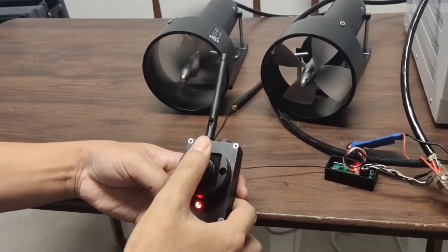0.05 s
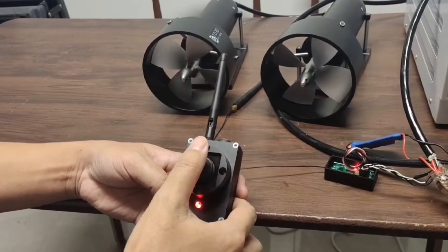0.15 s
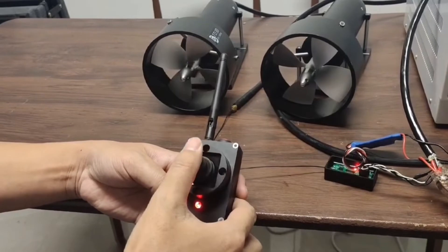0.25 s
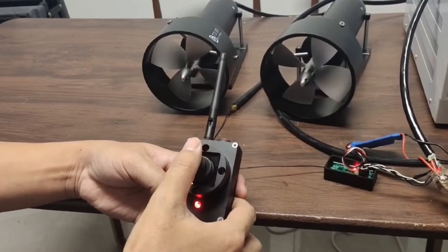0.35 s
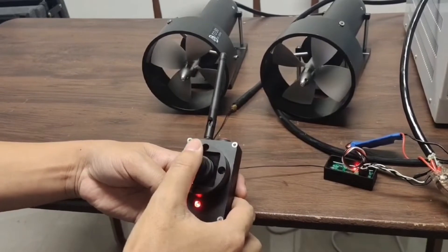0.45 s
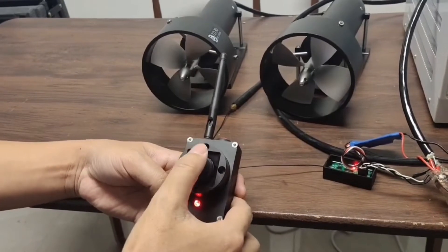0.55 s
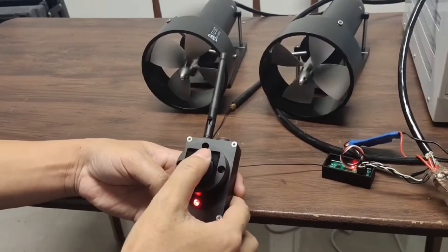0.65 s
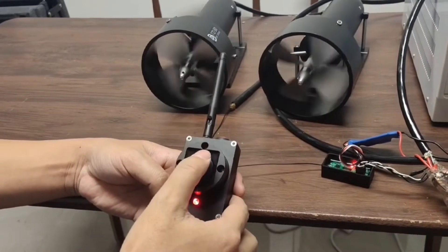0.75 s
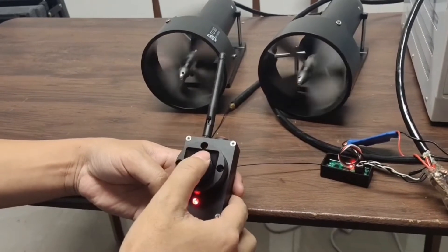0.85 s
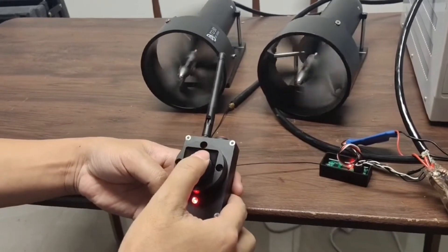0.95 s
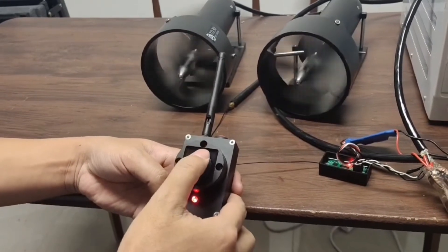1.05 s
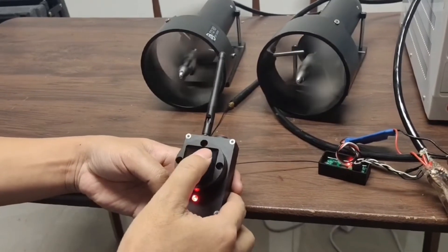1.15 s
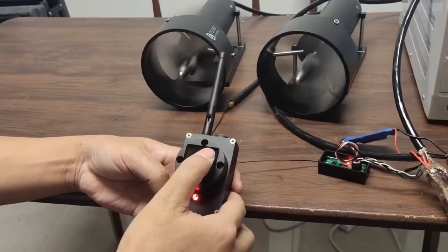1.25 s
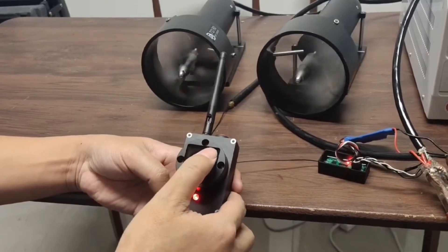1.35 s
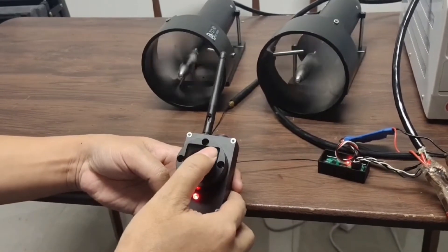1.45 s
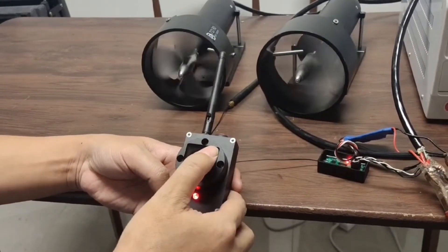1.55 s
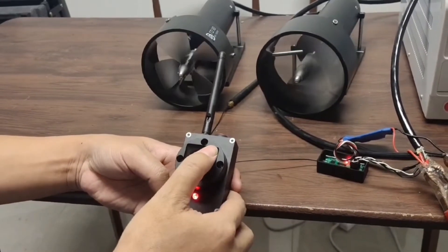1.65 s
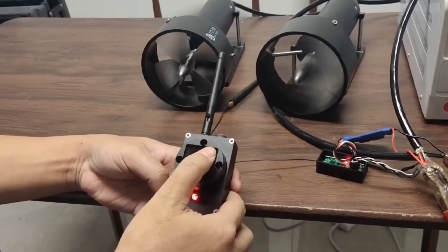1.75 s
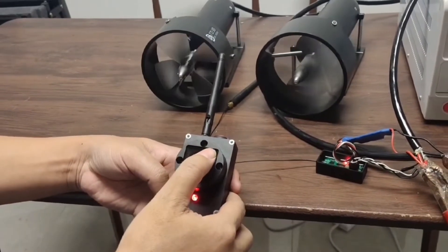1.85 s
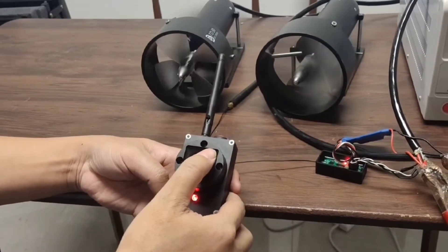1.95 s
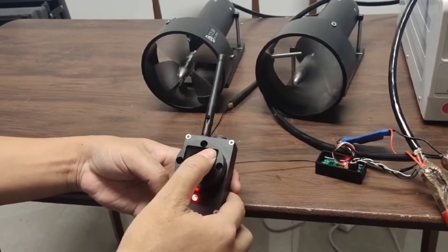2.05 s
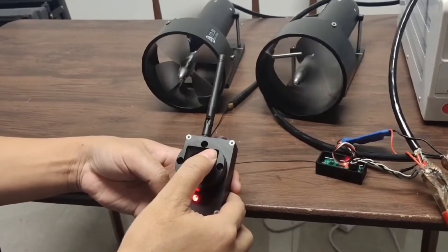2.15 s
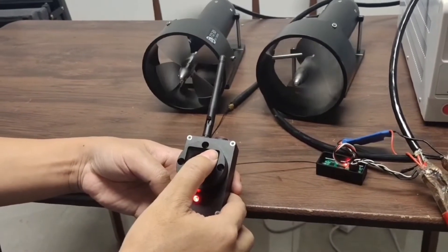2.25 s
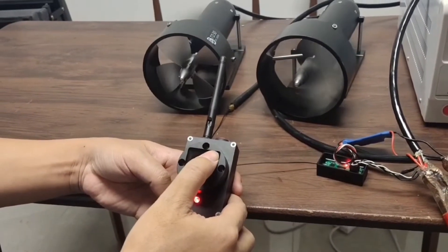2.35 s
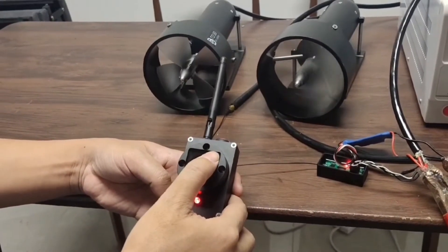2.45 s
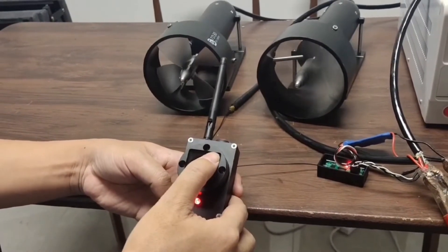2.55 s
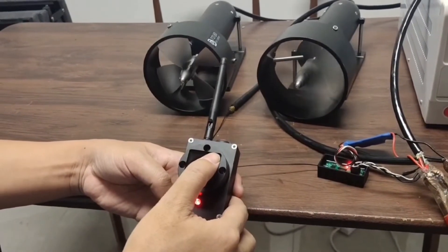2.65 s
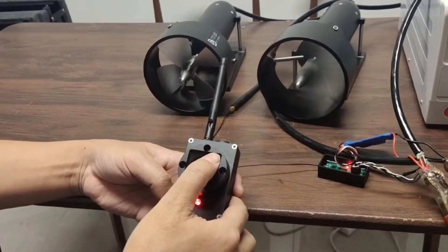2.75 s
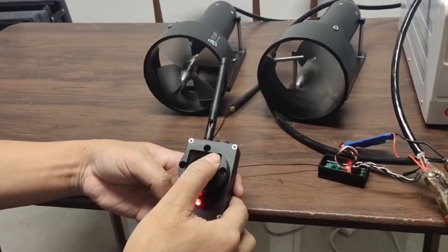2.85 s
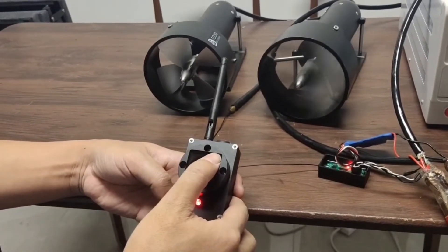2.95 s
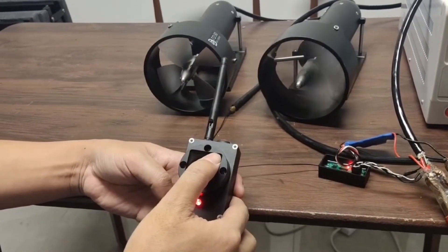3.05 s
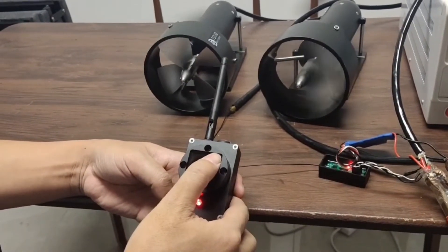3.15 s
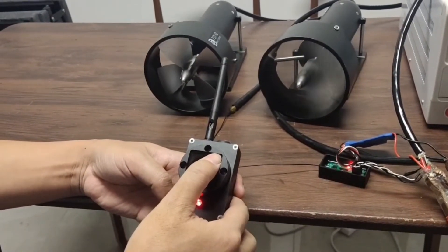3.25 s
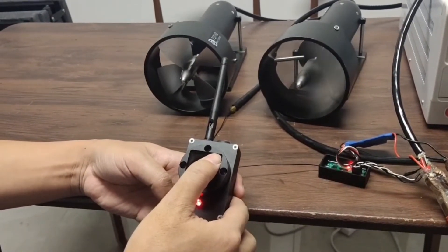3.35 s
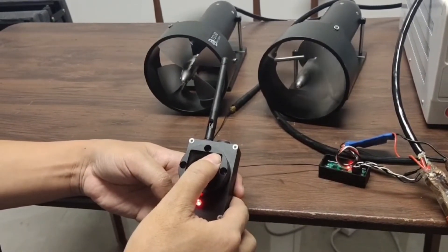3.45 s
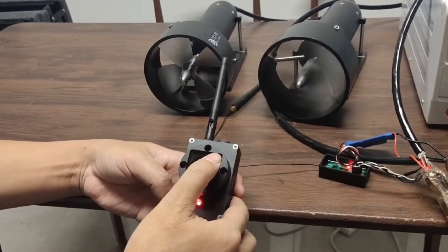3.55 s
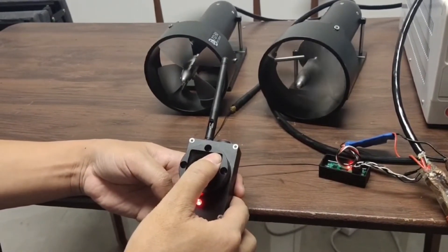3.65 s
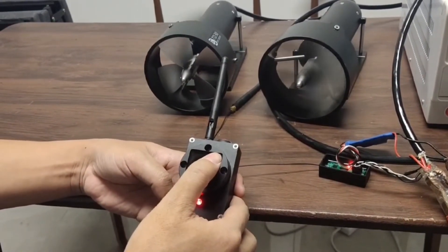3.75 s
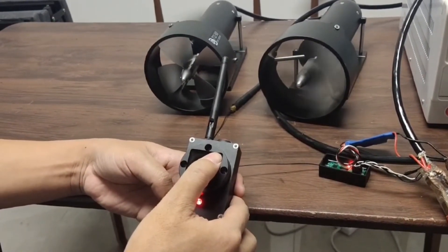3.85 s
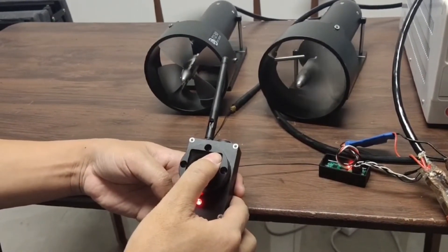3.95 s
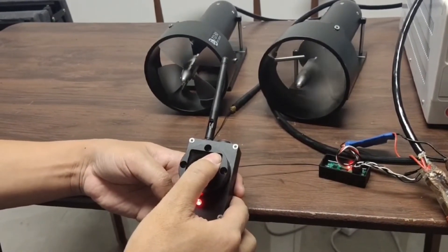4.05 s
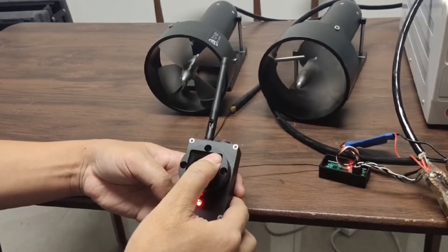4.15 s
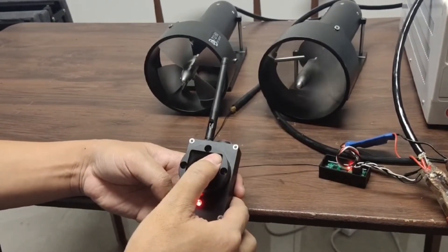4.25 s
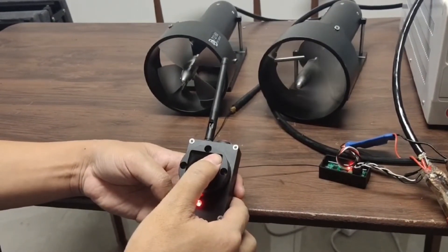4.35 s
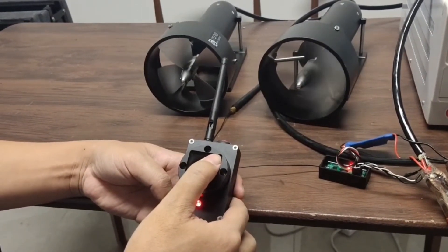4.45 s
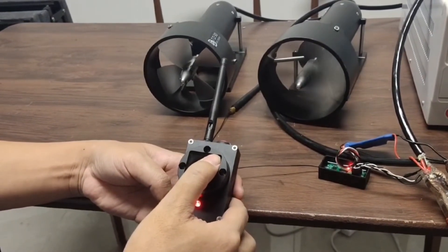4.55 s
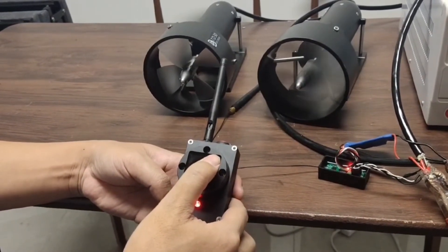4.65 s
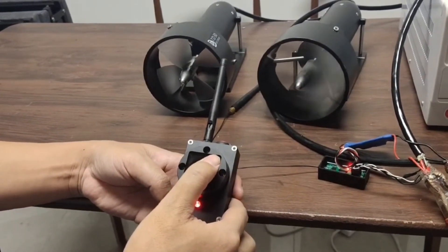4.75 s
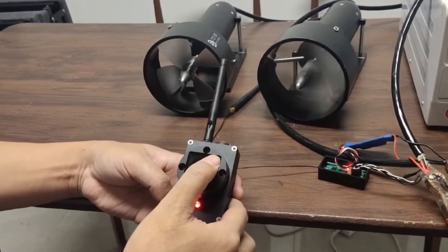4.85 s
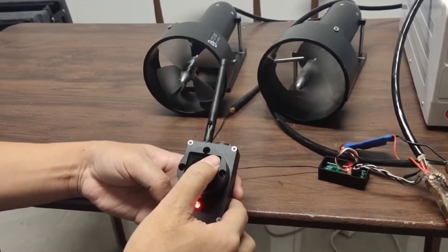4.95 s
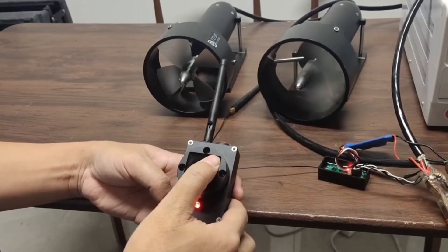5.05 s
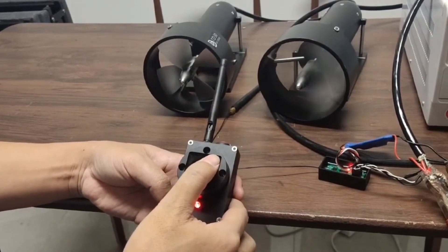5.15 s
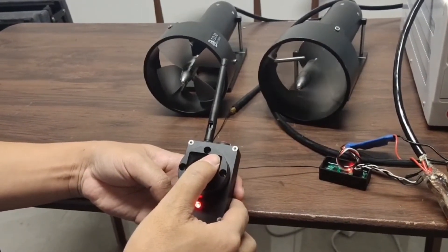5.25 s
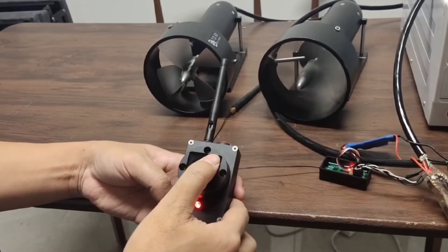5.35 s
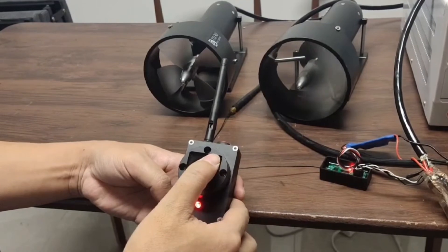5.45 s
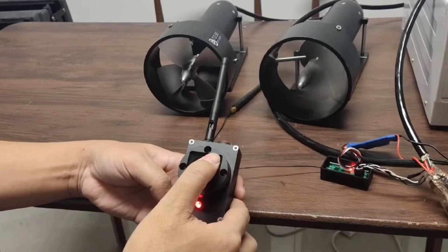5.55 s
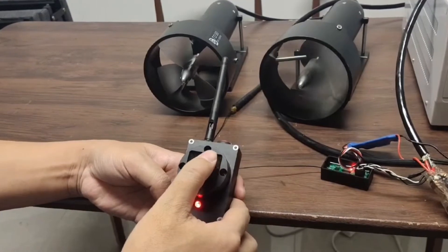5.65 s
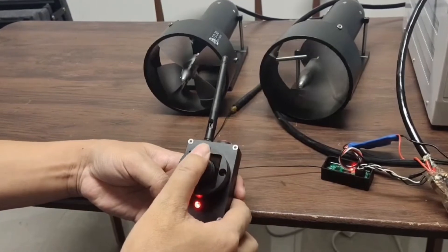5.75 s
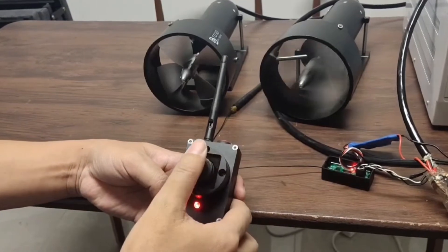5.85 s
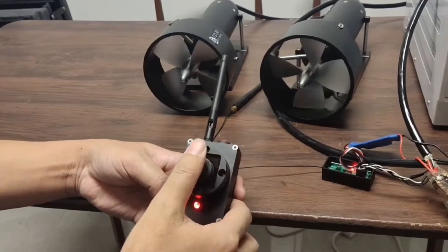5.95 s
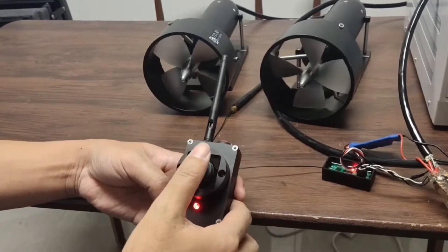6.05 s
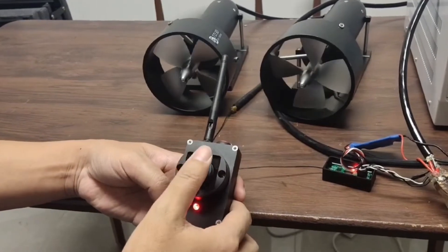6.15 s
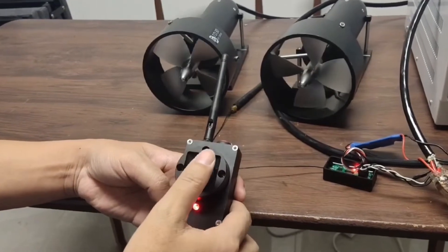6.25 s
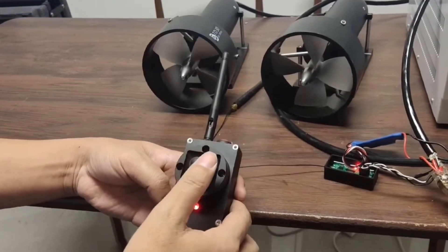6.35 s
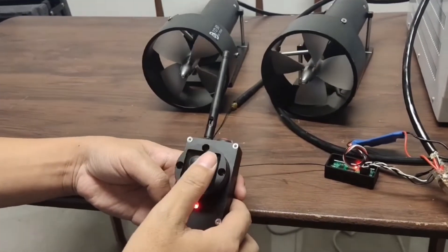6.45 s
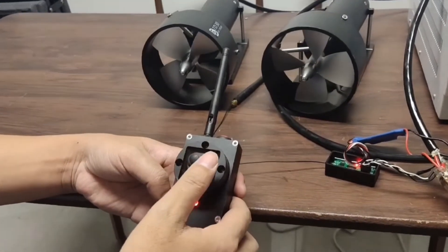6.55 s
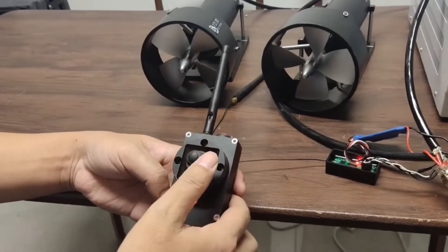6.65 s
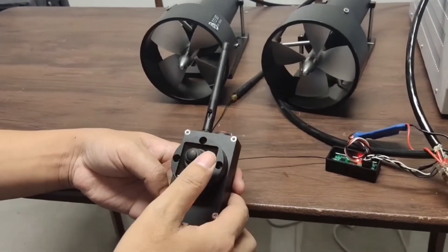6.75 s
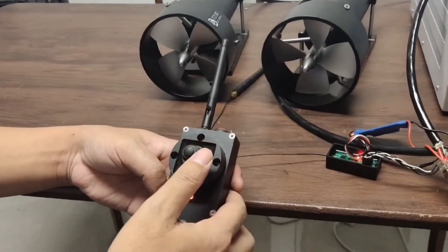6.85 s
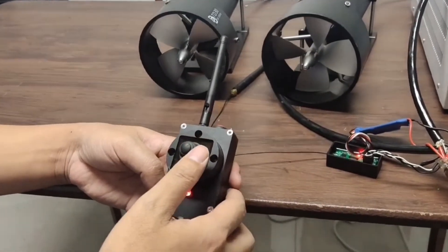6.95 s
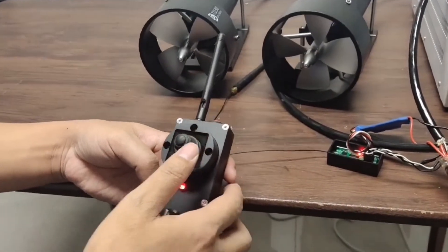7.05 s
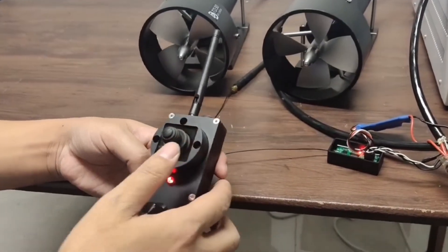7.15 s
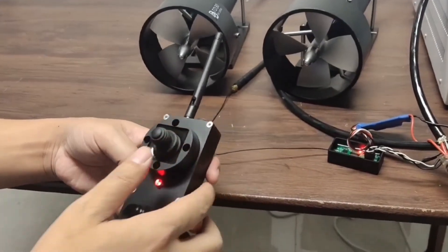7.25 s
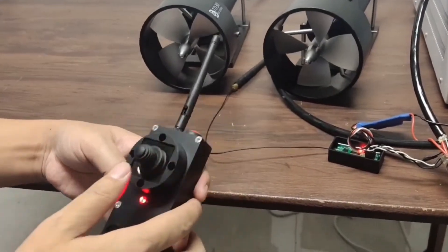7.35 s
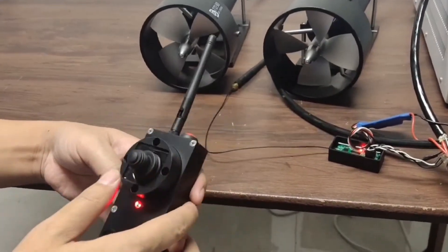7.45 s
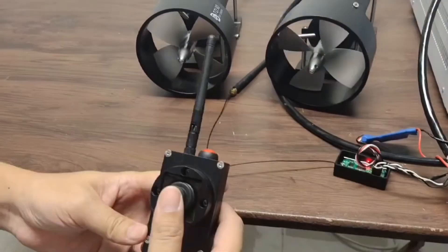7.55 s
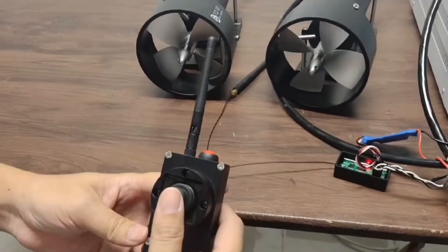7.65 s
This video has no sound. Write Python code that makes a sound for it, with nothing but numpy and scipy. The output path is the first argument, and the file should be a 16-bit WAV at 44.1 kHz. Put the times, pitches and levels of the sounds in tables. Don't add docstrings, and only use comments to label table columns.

```python
import sys
import numpy as np
from scipy import signal
from scipy.fft import rfft, irfft, next_fast_len
from scipy.io import wavfile
from scipy.ndimage import uniform_filter1d, map_coordinates

SR = 44100
rng = np.random.default_rng(int(sys.argv[2]) if len(sys.argv) > 2 else 0)


def put_to_file(sound):
    columns = np.atleast_2d(sound).T
    safe = np.clip(columns, -1, 1)
    whole_steps = np.round(safe * 32767)
    wavfile.write(sys.argv[1], SR, whole_steps.astype(np.int16))


def magnitude_from_level(level_db):
    exponent = np.asarray(level_db, float) / 20
    return 10 ** exponent


N = 340009

TOP_HZ = 1936.5
FULL_HZ = TOP_HZ / 60
EASY_PER_S = .2

# shaft order, level at full speed in dB rms.
POLE_ORDERS = [(8, -68), (17, -64), (18, -55), (19, -57), (20, -40), (21, -59), (30, -66), (40, -54),
               (54, -62), (60, -46.5)]
# shaft order, level at full
# speed in dB rms.
FURTHER_ORDERS = [(64, -64), (68, -62), (75, -53), (103, -62), (140, -65), (151, -58), (154, -64), (156, -61),
                  (158, -67), (165, -63), (166, -57), (167, -63), (168, -63), (170, -52), (172, -65),
                  (176, -67), (178, -65), (180, -63), (220, -73), (237, -77), (290, -71), (293, -69),
                  (294, -68), (296, -65), (297, -67), (315, -69), (316, -70),
                  (24, -67), (26, -68), (29, -72), (31, -69), (33, -74), (59, -66), (65, -66), (66, -70),
                (70, -70), (80, -70), (85, -72), (96, -73), (101, -67), (106, -67), (109, -67), (113, -72),
                (116, -72), (120, -71), (141, -72), (142, -71), (144, -74), (153, -71), (160, -68),
                (161, -70), (162, -69), (164, -67), (169, -69), (171, -68), (175, -71), (177, -70),
                (257, -75), (267, -74), (274, -75), (291, -71), (292, -72), (298, -71), (311, -72)]
ALL_ORDERS = POLE_ORDERS + FURTHER_ORDERS


def unit(x):
    return x / np.sqrt(np.mean(x ** 2) + 1e-20)


def along(points, hz):
    f, v = np.transpose(points)
    return np.interp(np.log(hz + 1), np.log(f + 1), v)


def wobble(rate):
    at = np.arange(0, N + 32, 32)
    knots = rng.standard_normal(int(N * rate / SR) + 4)
    return np.interp(np.arange(N), at, map_coordinates(knots, [at * rate / SR]))


def filtered(x, response):
    m = next_fast_len(N + SR)
    gain = response(np.fft.rfftfreq(m, 1 / SR))
    return irfft(rfft(x, m) * gain / np.sqrt(np.mean(np.abs(gain) ** 2)), m)[:N]


def resonance(f, center, width):
    return 1j * f * width / (center * center - f * f + 1j * f * width)


def quiet():
    # frequency in Hz, density in dB per Hz.
    air = [(15, -45), (25, -37.5), (177, 3), (281, -8.5), (345, -7), (578, -9.5), (1190, -21), (2260, -22),
           (2780, -23), (3330, -25.5), (7600, -34), (9500, -35.5), (11800, -34.5), (15300, -58.5),
           (22000, -120)]
    # time in seconds, spread in seconds, rise in dB.
    stirs = [
        (.64, 0.047, 3.5),
        (6.55, 0.066, 2.5),
        (7.06, .04, 5.5),
        (7.42, 0.085, 8),
    ]
    t = np.arange(N) / SR
    stir_db = sum(db * np.exp(-.5 * ((t - s) / spread) ** 2) for s, spread, db in stirs)
    low_db = -66.5 + stir_db
    rustle_db = -79 + 0.58 * stir_db
    low = filtered(rng.standard_normal(N), lambda f: magnitude_from_level(along(air, f)) / (1 + (f / 600) ** 4))
    z = signal.stft(rng.standard_normal(N), nperseg=512)[2]
    field = uniform_filter1d(rng.standard_normal(z.shape), size=5, axis=0)
    field = uniform_filter1d(field, size=10, axis=1)
    patchy = signal.istft(z * magnitude_from_level(3.8 * unit(field)), nperseg=512)[1][:N]
    high = filtered(patchy, lambda f: magnitude_from_level(along(air, f)) / (1 + (600 / (f + 1)) ** 4))
    return magnitude_from_level(low_db) * unit(low * magnitude_from_level(3.2 * wobble(25))) + magnitude_from_level(rustle_db + 9.0) * unit(high)


def laws(table, far_db):
    s, *columns = np.transpose(np.vstack(table))
    hz, strain_db, pull_db = [np.interp(np.arange(N) / SR, s, column) for column in columns]
    speed = np.clip(hz / TOP_HZ, 1e-4, 1)
    slope = uniform_filter1d(np.gradient(speed) * SR, size=900)
    change = np.abs(slope)
    load = change / (change + EASY_PER_S)
    octaves = np.log2(speed)
    on_db = far_db + 40 * np.log10(np.minimum(speed / .12, 1))
    backwards = np.arange(N) < .5 * SR
    slip_db = 1.2 * np.maximum(change - 9, 0)
    whine_db = on_db + pull_db - 16.5 * backwards * (1 - load) + 7.5 * load - slip_db
    hum_db = on_db + 0.32 * pull_db - 4 * load + 14.5 * backwards * (1 - speed) + 9 * octaves
    mesh_db = on_db - 39.5 + 7 * backwards + 5 * octaves
    return speed, slope, whine_db, hum_db, mesh_db, strain_db


def magnetic_tones(turns, speed, slope, whine_db, hum_db, orders, path):
    # shaft order, peak level in dB before the whine's own
    # changes, loss per halving of speed in dB.
    load_orders = [(20, -46, 2), (30, -46, 4), (40, -53, 2), (120, -67, 0)]
    change = np.abs(slope)
    tones = np.zeros(N)
    for order, db in orders:
        phase = 2 * np.pi * (order * (turns % 1) + rng.random())
        tone = np.sqrt(2) * np.sin(np.float32(phase)) / path(order * FULL_HZ)
        if order == 60:
            level_db = whine_db + 0.53 * wobble(9) + 1.2 * wobble(45)
        elif order in (20, 30):
            level_db = hum_db + 0.47 * wobble(11)
        elif order < 60:
            level_db = hum_db - 90 * (1 - speed) + 1.6 * wobble(10)
        else:
            level_db = 1 - 260 * (1 - speed) - 24 * change / (change + EASY_PER_S) + 1.5 * wobble(7)
        tones += magnitude_from_level(db + level_db) * tone
    rising = np.clip(slope, 0, None)
    effort = rising / (rising + .5) * (1 - speed ** 8)
    for order, db, octave_db in load_orders:
        level = magnitude_from_level(db + whine_db + octave_db * np.log2(speed) + 3 * wobble(9))
        tones += level * effort * np.sin(np.float32(2 * np.pi * order * (turns % 1))) / path(TOP_HZ)
    stutter = magnitude_from_level(np.minimum(1.5 * change, 4) * wobble(160))
    return tones * stutter


def gear_noise(turns, speed, slope, mesh_db, strain_db):
    flaws = rng.standard_normal((2, 1024))
    angle = turns % 1 * 1024
    each_turn = lambda pattern: map_coordinates(pattern, [angle], order=1, mode="grid-wrap")
    comb = rfft(flaws[0])
    comb *= np.sqrt(32 / np.abs(comb))
    comb[[order for order, db in ALL_ORDERS]] = 0
    teeth = each_turn(irfft(comb))
    beat = each_turn(unit(uniform_filter1d(flaws[1], size=90, mode="wrap")))
    grit = unit(magnitude_from_level(2 * beat) * rng.standard_normal(N))
    grind = magnitude_from_level(mesh_db) * (magnitude_from_level(-12.5) * teeth + magnitude_from_level(-6.0) * grit)

    shake = unit(magnitude_from_level(2.2 * wobble(40) + beat) * rng.standard_normal(N))
    dull = uniform_filter1d(shake, size=9)
    thin = magnitude_from_level(-20 * speed ** 5 * (slope > 0))
    bright = magnitude_from_level(.6 * np.log2(2 * speed).clip(-3, 0))
    chatter = unit(irfft(comb * np.abs(comb) ** 2 * (np.arange(len(comb)) > 150)))
    streaks = magnitude_from_level(-4 + 3.4 * wobble(12)) * each_turn(chatter)
    rattle = magnitude_from_level(strain_db) * (thin * dull + bright * (shake - dull) + streaks)
    return grind, rattle


def motor(table, far_db, orders, path):
    speed, slope, whine_db, hum_db, mesh_db, strain_db = laws(table, far_db)
    judder = (.0003 + .003 * np.abs(slope) ** 1.5) * wobble(130)
    turns = np.cumsum(speed * FULL_HZ * (1 + judder)) / SR
    tones = magnetic_tones(turns, speed, slope, whine_db, hum_db, orders, path)
    return tones, *gear_noise(turns, speed, slope, mesh_db, strain_db)


def casing(f):
    # frequency in Hz, width in Hz, level over the plain wall in dB.
    modes = [(127.3, 8.2, 4.5), (204, 13, 3), (303, 15, 15.5), (397, 100, 8.5), (498, 24, 9.5),
             (598, 18, 12), (790, 27, 2), (853, 31, -3), (984, 66, -7.5), (1365, 35, 5.5), (1742, 29, 6.5),
             (2415, 36, 16), (2481, 24, 10.5), (3332, 92, 10), (4503, 64, 4.5), (5020, 440, -6.5),
             (5325, 280, 1), (5700, 66, 2), (8560, 140, -4), (9500, 640, -2)]
    plain = (1j * f / 300) ** 2 / (1 + 1j * f / 300) ** 2
    return plain + sum(magnitude_from_level(db) * resonance(f, c, w) for c, w, db in modes)


def stator(f, ring_db=0):
    # frequency in Hz, width in Hz, level over the plain wall in dB.
    iron = [(125, 7, 10), (184, 8, 14), (299, 14, 13), (500, 20, 9), (597, 5, 23), (1375, 9, 15),
            (1410, 10, 22), (1686, 8, 26), (1722, 10, 23)]
    return casing(f) + sum(magnitude_from_level(db + ring_db) * resonance(f, c, w) for c, w, db in iron)


def mount(f):
    # frequency in Hz, width in Hz, level in dB.
    table_top = (840, 1070, 7.1)
    c, w, db = table_top
    return stator(f) + magnitude_from_level(db) * resonance(f, c, w)


def thrusters(echo):
    # time in seconds, slot whine in Hz, strain rattle in dB, magnetic pull in dB.
    right = [
        [(.07, TOP_HZ, -51, -0.5), (.095, 1700, -45.5, 2), (.115, 1420, -42, -0.5), (.15, 1000, -44.5, -4.5),
         (.18, 600, -43, -0.5), (.21, 310, -41, 5.5), (.26, 120, -41, 0), (.29, 0, -78.5, -1)],
        [(.716, 0, -100, -11.5), (.719, 65, -46, -10.5), (.8, 188, -46.5, -14.5), (.88, 318, -45.5, -0.5),
         (.99, 483, -43.5, 4), (1.084, 612, -41.5, 3.5), (1.13, 680, -39, 5.5), (1.23, 875, -40, -1.5),
         (1.29, 980, -38, 2.5), (1.41, 1184, -39.5, -0.5), (1.51, 1291, -40, 6), (1.63, 1428, -42, -1.5),
         (1.73, 1475, -41, -5.5), (1.83, 1566, -42.5, -4.5), (1.91, 1684, -48, 0), (2.05, 1800, -49, -2),
         (2.15, 1885, -52, -2.5), (2.2, 1922, -62, -1), (2.26, TOP_HZ, -73.5, -0.5)],
        [(5.84, TOP_HZ, -70, -0.5), (5.86, 1860, -58, -4.5), (5.882, 1750, -50, 1.5), (5.903, 1680, -46, 4),
         (5.915, 1440, -43, 1.5), (5.932, 1370, -40.5, 7.5), (5.948, 900, -40, -4), (5.968, 420.5, -39, -3),
         (5.995, 189.5, -46, 1.5), (6.05, 120.5, -65.5, 6), (6.09, -1, -82, 2)],
    ]
    # time in seconds, slot whine in Hz, strain rattle in dB, magnetic pull in dB.
    left = [
        [(0, 980.5, -53, 3.5), (.14, 980, -45, -2.5), (.2, 330, -40, -1.5), (.27, -0.5, -87, 4)],
        [(.74, -0.5, -85, -10), (.75, 59.5, -52, -11), (.82, 131, -49, -6), (1.0, 470, -42, 1.5),
         (1.31, 1020, -36.5, 4), (1.4, 830, -38, 0.5), (1.51, 585.5, -39, 2.5), (1.58, 430, -40.5, 4.5),
         (1.64, 319.5, -43.5, -4.5), (1.73, 123, -47, -0.5), (1.84, 2, -54, 0), (1.88, 0.5, -90, 0)],
    ]
    # frequency in Hz, density in dB per Hz.
    mesh = [(40, -86), (80, -54), (200, -19.5), (450, -46.5), (620, -11), (1150, -21), (1900, -14.5),
            (2750, -17.5), (3750, -20.5), (4100, -28.5), (4450, -21.5), (5400, -18.5), (6400, -25.5),
            (6800, -33), (7900, -27), (8400, -22), (10300, -19.5), (12500, -49.5)]
    # frequency in Hz, density in dB per Hz.
    strain = [(41, -74.5), (100, -43), (220, -17), (320, -6), (501, -2.5), (1100, -12), (1380, -11.5),
              (2020, -13.5), (2450, -18), (2750, -40), (3290, -39.5), (3650, -33), (3950, -19.5),
              (4300, -20.5), (5400, -16), (6300, -18.5), (6900, -26.5), (7600, -14), (8400, -14),
              (10100, -26), (11000, -54.5), (22000, -120)]
    heard = rfft(echo, 4 * SR)
    path = lambda f: abs(mount(f) * heard[round(f * 4)])
    near = motor(right, 0, ALL_ORDERS, path)
    far = motor(left, -5, POLE_ORDERS, path)
    tones, grind, rattle = np.add(near, far)
    m = next_fast_len(N + SR)
    shell = irfft(rfft(tones + jolts(), m) * mount(np.fft.rfftfreq(m, 1 / SR)), m)[:N]
    shell += filtered(grind, lambda f: magnitude_from_level(along(mesh, f)) * casing(f))
    shell += filtered(rattle, lambda f: magnitude_from_level(along(strain, f)) * stator(f, -7.5))
    return signal.sosfilt(signal.butter(4, 118, "high", fs=SR, output="sos"), shell)


def room():
    # frequency in Hz, time to fall 60 dB in seconds.
    decay = [(120, 0.86), (300, 0.43), (600, 0.62), (1000, 0.46), (1500, 0.76), (2300, 0.45), (5000, 0.51),
             (10000, 0.44)]
    hz, t, z = signal.stft(rng.standard_normal(SR), SR, nperseg=256)
    tail = signal.istft(z * magnitude_from_level(-60 * t / along(decay, hz)[:, None]), SR, nperseg=256)[1]
    return np.r_[1, np.zeros(300), magnitude_from_level(-7) * tail / np.linalg.norm(tail)]


def jolts():
    # time in seconds, peak in dB.
    blows = [(.174, -29.5), (.199, -28.5), (.249, -33), (.745, -42), (.959, -34.5), (5.945, -31.5),
             (5.958, -30.5), (5.973, -31), (5.985, -33), (6.008, -35), (6.03, -39), (6.055, -42)]
    contact_s = 0.00076
    out, u = np.zeros(N), np.arange(SR // 50) / SR / contact_s
    for s, db in blows:
        out[round(s * SR):][:len(u)] -= magnitude_from_level(db) * 2 * u * (2 - u) * np.exp(-u)
    return out


def scuffs():
    # time in seconds, spread in seconds, level in dB, pitch in Hz.
    rubs = [(.64, .04, -73, 3020), (6.44, .025, -71, 2700), (6.43, .02, -73, 3270), (6.67, .02, -75, 2450),
            (6.72, .02, -75, 2780), (7.08, 0.025, -73, 2750), (7.36, .012, -72, 2400),
            (7.36, .015, -74, 3100), (7.46, 0.023, -70, 2000)]
    t, out = np.arange(N) / SR, np.zeros(N)
    for s, spread, db, hz in rubs:
        rub = filtered(rng.standard_normal(N), lambda f: resonance(f, hz, 260) ** 2)
        out += magnitude_from_level(db) * np.exp(-.5 * ((t - s) / spread) ** 2) * rub
    return out


def hands():
    # time in seconds, peak in dB, pitch in Hz.
    bumps = [(6.407, -45, 159), (6.523, -49.5, 177), (7.058, -53, 133), (7.166, -46.5, 219),
             (7.343, -53.5, 181), (7.409, -52.5, 184)]
    # time in seconds, peak in dB, pitch in Hz.
    click = [(7.431, -32.5, 2010)]
    out, t = np.zeros(N + SR), np.arange(SR // 10) / SR
    for s, db, hz in bumps:
        ring = magnitude_from_level(-60 * t / 0.073) * np.sin(2 * np.pi * hz * t) * (1 - np.exp(-t / 0.0022))
        out[round(s * SR):][:len(t)] += magnitude_from_level(db) * ring
    for s, db, hz in click:
        ring = magnitude_from_level(-60 * t / 0.005) * np.sin(2 * np.pi * hz * t) * (1 - np.exp(-t / .00015))
        ring += 0.2 * magnitude_from_level(-60 * t / 0.0055) * rng.standard_normal(len(t))
        out[round(s * SR):][:len(t)] += magnitude_from_level(db) * ring
    return out[:N]


def scene():
    echo = room()
    return (signal.fftconvolve(thrusters(echo) + hands(), echo)[:N] + quiet() + scuffs())[None]


def starved(x):
    # frequency in Hz, band level under the whole in dB.
    floor_db = [(250, -50), (450, -49), (700, -49), (1150, -44), (1550, -43), (2000, -46), (2800, -44),
                (3400, -47), (4100, -45), (4800, -47), (6200, -45), (6800, -45), (7400, -46), (7900, -43),
                (8300, -52.5), (9000, -58), (10400, -46), (10700, -42), (11200, -34), (12000, -29.5)]
    hz, t, z = signal.stft(x, SR, window="cosine", nperseg=2048, noverlap=1024)
    power = np.abs(z[:1024]) ** 2
    whole = 1.6 * np.sqrt(power.sum(axis=0) * power[100:].sum(axis=0))
    usual = np.median(whole)
    bands = power.reshape(256, 4, -1).mean(axis=1)
    limit = magnitude_from_level(along(floor_db, hz[2:1024:4]))[:, None] ** 2
    limit = limit * np.minimum(whole, 1.15 * usual) ** 1.25 / usual ** .25
    limit = limit * magnitude_from_level(2 * 1.5 * wobble(9)[np.minimum(t * SR, N - 1).astype(int)])
    z[:1024] *= np.repeat(bands > limit, 4, axis=0)
    return signal.istft(z, SR, window="cosine", nperseg=2048, noverlap=1024)[1][:N]


def low_pass(x):
    return signal.sosfilt(signal.butter(12, 11900, fs=SR, output="sos"), x)


def record(dry):
    t = np.arange(N) / SR
    mute_s, faded_s, back_s = 7.512, 0.0097, 7.667
    faint = magnitude_from_level(-19) * ((t < mute_s + faded_s) | (t > back_s))
    gate = magnitude_from_level(-1.5) * np.where(t < mute_s, 1, faint)
    return low_pass(starved(dry[0])[None] * gate)


dry = scene()
out = record(dry)
put_to_file(out)
```